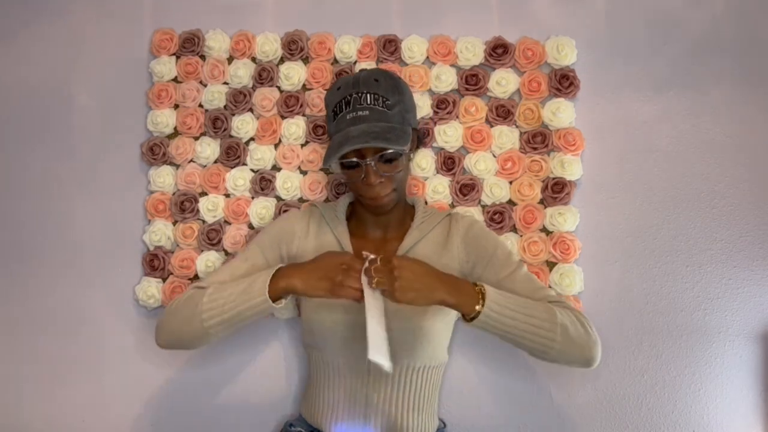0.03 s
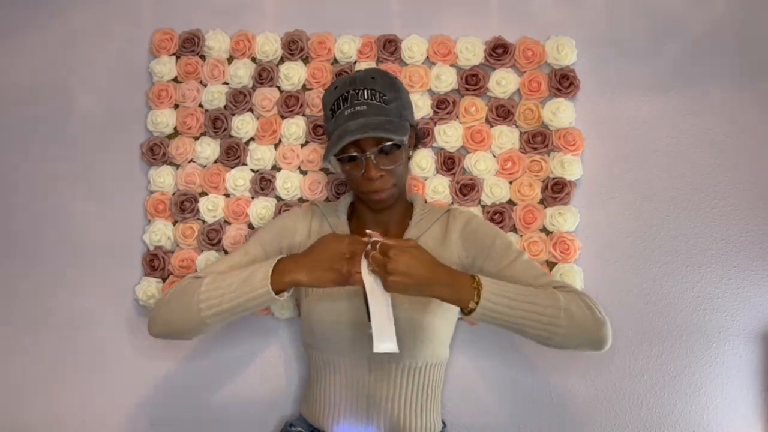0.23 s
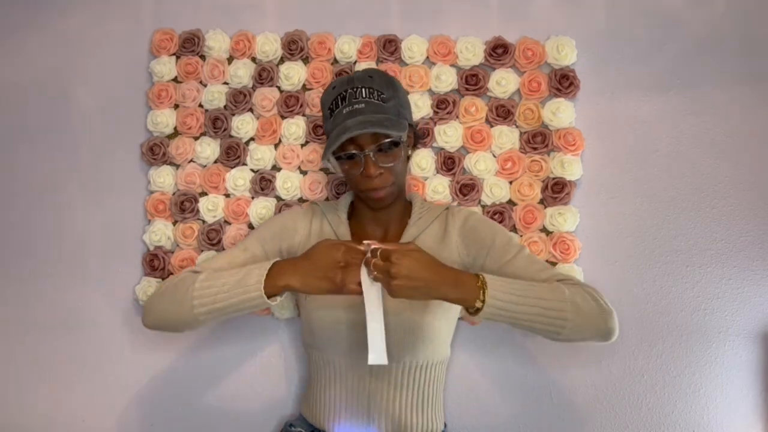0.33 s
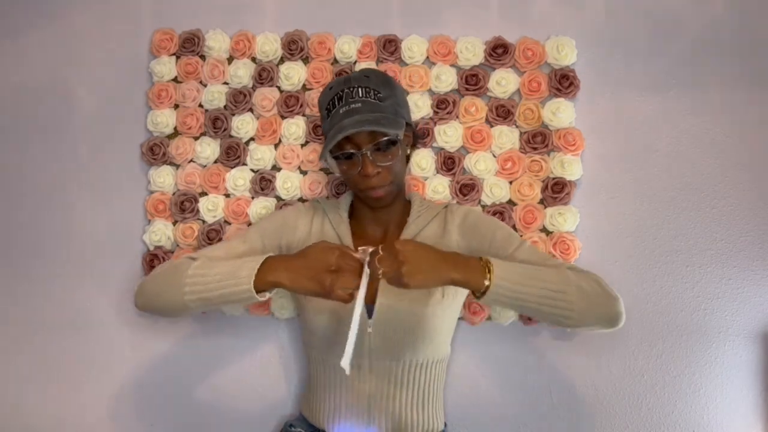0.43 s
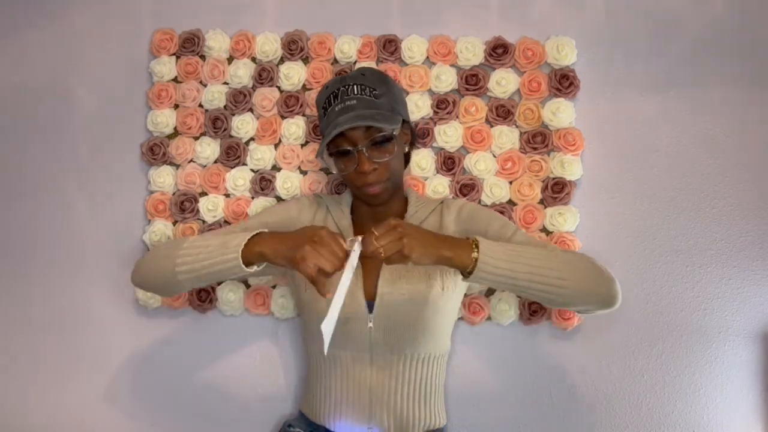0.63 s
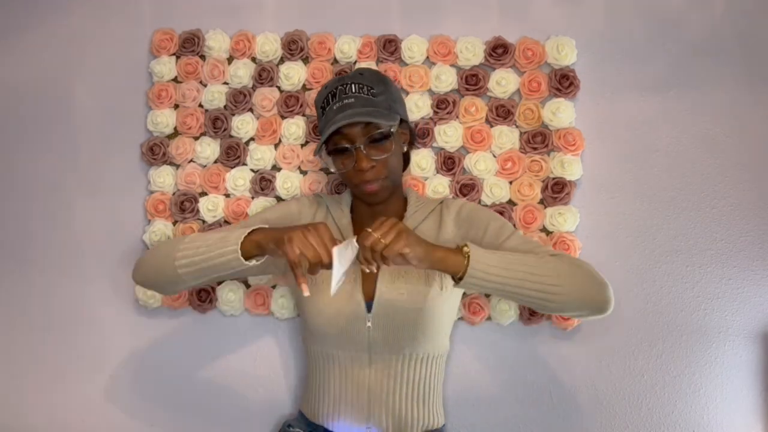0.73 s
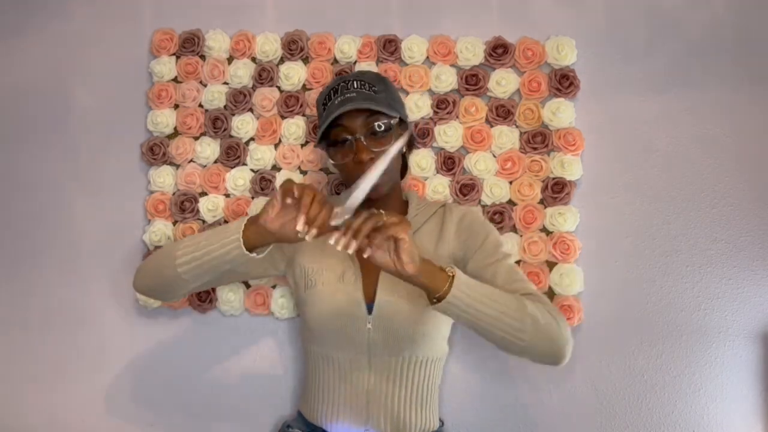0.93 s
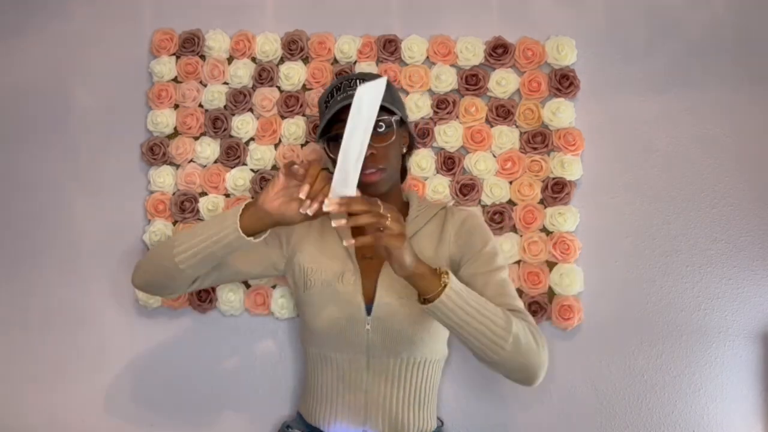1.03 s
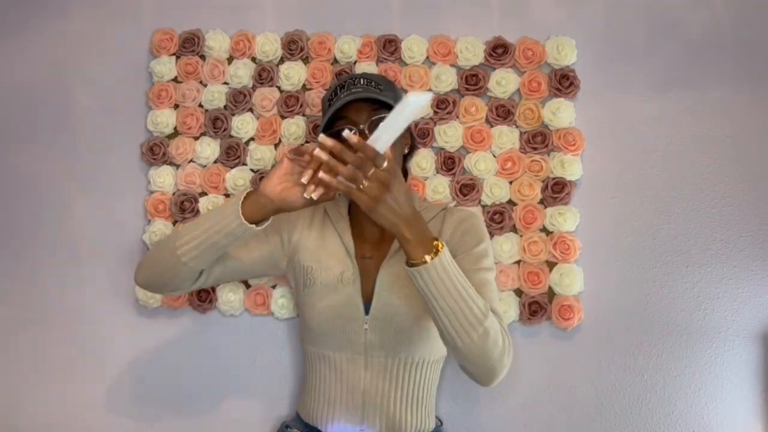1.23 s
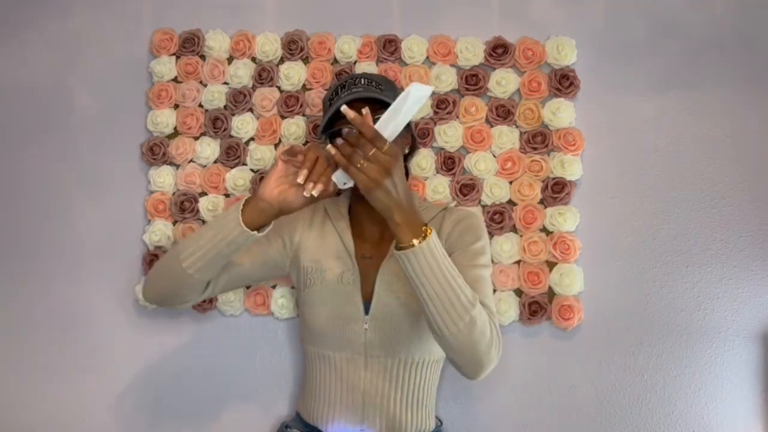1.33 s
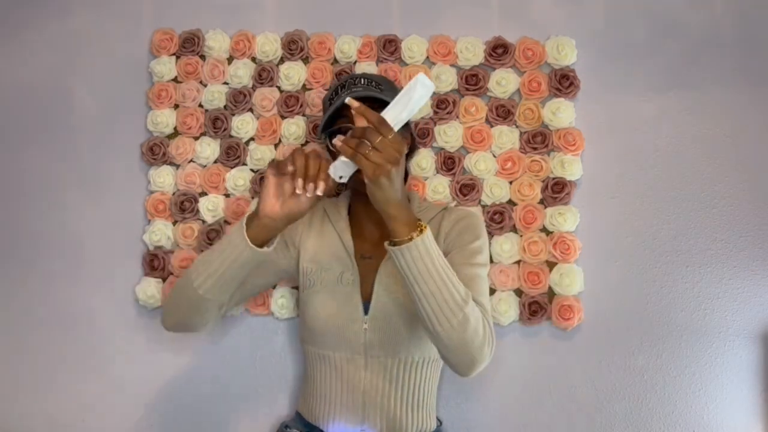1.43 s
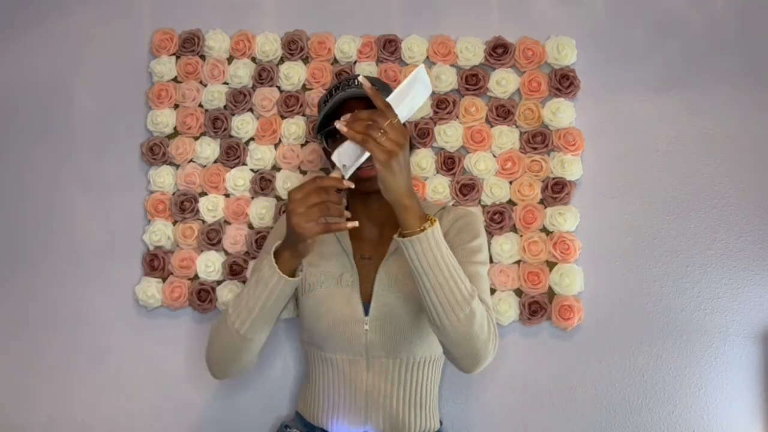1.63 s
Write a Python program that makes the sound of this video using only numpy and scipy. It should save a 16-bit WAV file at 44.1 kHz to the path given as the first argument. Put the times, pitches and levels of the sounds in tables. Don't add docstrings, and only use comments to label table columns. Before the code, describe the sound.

Thin plastic film crackles and snaps as fingers tug and tear a small packet in a room.

```python
import sys
import numpy as np
from scipy import signal
from scipy.fft import rfft, irfft
from scipy.io import wavfile
from scipy.ndimage import uniform_filter1d

SR = 44100
rng = np.random.default_rng(int(sys.argv[2]) if len(sys.argv) > 2 else 0)


def put_to_file(sound):
    columns = np.atleast_2d(sound).T
    safe = np.clip(columns, -1, 1)
    whole_steps = np.round(safe * 32767)
    wavfile.write(sys.argv[1], SR, whole_steps.astype(np.int16))


def gain_from_decibels(decibels):
    exponent = np.asarray(decibels, float) / 20
    return 10 ** exponent


N = 74970

# start_s, peak_db,
# pitch_hz, crack_over_pitch_db, share_to_walls_db
TUGS = [(0.001, -52, 4700, 2, 5.5), (0.038, -46.5, 4850, 4, -9), (0.043, -46.5, 6300, -1.5, 5.5),
        (0.054, -47, 6310, -20, -20), (0.125, -27.5, 6150, -14.5, -5.5), (0.161, -29.5, 6850, -23, -4),
        (0.193, -38, 3780, -9, -4), (0.229, -20.5, 3130, -4, -2), (0.229, -32, 6400, 4, 5),
        (0.229, -33.5, 1310, -23, 1), (0.2352, -25, 3300, -6, 0), (0.363, -53.5, 2290, -6, 9.5),
        (0.387, -45.5, 1370, -3.5, 1), (0.407, -75.5, 1680, -31, -10), (0.432, -44.5, 2140, -2.5, -1),
        (0.4615, -44, 2220, 3, 2), (0.464, -23.5, 4340, -8, -11), (0.464, -31.5, 6300, -18, 6.5),
        (0.468, -32, 2660, -11, 3.5), (0.6135, -58.5, 3100, 0.5, -1), (0.633, -54, 1660, -14, -1),
        (0.659, -28.5, 3000, -17, -1.5), (0.659, -49, 2270, -20, -6), (0.711, -28, 6700, -9, 6.5),
        (0.828, -30, 2770, -16, 1.5), (0.833, -32, 2450, -10, -7), (0.846, -37.5, 2900, -18, 0),
        (0.881, -38.5, 4180, -25, -8), (1.189, -36.5, 3030, -9, -1.5), (1.4058, -27, 2240, -16.5, -0.5),
        (1.4058, -31.5, 4440, -1.5, 2), (1.4138, -22, 2930, -30, -10), (1.478, -41, 1830, -7, -5),
        (1.4815, -33, 1970, -21, -4.5), (1.49, -45, 2170, -26, -4), (1.575, -43, 2130, -19, -2),
        (1.586, -38, 3650, -37, -6), (1.586, -44, 1680, -13, -3), (1.626, -43.5, 2920, -10, -3)]
# start_s, peak_db, pitch_hz, crack_over_pitch_db, share_to_walls_db
TEARS = [(0.795, -25.5, 3110, -2.5, -4), (0.7938, -27, 6100, -14, -2), (0.8225, -33.5, 7560, -2, 0.5),
         (0.8215, -41.5, 11400, -13, -7), (0.947, -45, 2530, -4, -4), (1.016, -55.5, 2740, -12.5, 10),
         (1.057, -58, 1426, 1.5, 0.5), (1.063, -49, 2880, -6, -1), (1.196, -39, 6250, -10, 1),
         (1.233, -38.5, 6400, -27, 6.5), (1.241, -35, 2680, 2, -7), (1.2435, -30.5, 6340, -4.5, 3.5),
         (1.247, -29.5, 2720, -7, -3), (1.251, -30, 4700, -20, -15), (1.255, -37, 5860, -10, -7),
         (1.268, -32, 4970, 1.5, -2), (1.273, -39, 5470, -9, -13), (1.2894, -33.5, 5930, -3, 3),
         (1.2916, -29.5, 2640, -11, -5), (1.294, -34.5, 1390, -5, -8), (1.3203, -27, 8000, -6, -5),
         (1.3228, -30.5, 4440, 3.5, -3.5), (1.324, -30, 2150, 0, -2.5), (1.352, -38, 2170, -14, 2),
         (1.365, -37, 2580, -26, 2), (1.534, -52.5, 1670, -4, 6)]
# start_s, effort_db, grip_db
HANDS = [(0.0, -49.5, 6.5), (0.118, -64, -4), (0.355, -59, -1.5), (0.487, -77.5, -23.5), (0.684, -60.5, 10),
         (0.832, -64, 6), (0.95, -64, 9.5), (1.005, -76, 15.5), (1.064, -61.5, 6), (1.1, -76.5, 4),
         (1.154, -89, 13), (1.186, -80, -1), (1.195, -58.5, -1), (1.23, -59.5, -6), (1.25, -49.5, 1.5),
         (1.368, -54, 7), (1.4, -64, 10), (1.5, -60.5, 9.5), (1.594, -68.5, 15), (1.7, -62, -39)]
# start_s, peak_db, pitch_hz
KNOCKS = [(0.102, -53.5, 450), (.231, -56, 450), (.231, -45.5, 1030), (.465, -58.5, 500),
          (0.376, -50.5, 510), (0.601, -61.5, 59), (0.739, -68, 357), (.797, -38, 830), (0.837, -48, 380),
          (0.857, -58, 380), (1.06, -56, 760), (1.191, -51, 1010), (1.248, -40, 796), (1.251, -49.5, 257),
          (1.292, -43, 450), (1.323, -41.5, 377), (1.325, -51, 169), (1.33, -36.5, 970), (1.55, -59, 450)]
# frequency_hz, level_db
FILM_TONE = [(500, -23), (1500, 16.5), (3000, 17.5), (4600, 13.5), (6500, 23), (9000, 4.5), (12000, 0),
             (16000, -56)]
# delay_s, left_db, right_db
WALLS = [(.0028, -14, -15), (.0042, -10, -11), (.0058, -7, -5), (.0082, -13, -14), (.0106, -5, -8),
         (.0145, -11, -12), (.019, -11, -14)]
# frequency_hz, decay_s
ROOM_DECAY = [(250, 0.19), (700, 0.33), (2000, 0.16), (5000, 0.24), (9000, 0.18), (15000, 0.086)]
# frequency_hz, likeness_ratio
SAMENESS = [(60, 0.99), (130, 0.45), (300, 0.57), (700, 0), (1500, 0), (8000, 0.63)]
# frequency_hz, balance_db
BALANCE = [(60, -2), (150, 6.5), (380, -3.5), (950, 4), (2380, 0.5), (5980, 8.5), (15000, -5.5)]
# frequency_hz, lead_rad
PORT_LEAD = [(300, 0), (700, .3), (1200, -.3), (3500, 1.3), (6400, 1.7), (8500, .4), (9700, -3),
             (10800, -3.1), (11400, -6.2), (12700, -6.4), (13300, -9.1), (14300, -9.6), (15100, -12.6)]
# frequency_hz, density_db (per Hz)
HUM_TONE = [(15, -60), (30, -27.5), (58, 0.5), (100, -11), (300, -18), (800, -29.5), (1700, -21),
            (3000, -33), (9000, -50.5), (16000, -87)]
# frequency_hz, gain_db
MIC_TONE = [(3000, -1.5), (4400, 3.5), (6500, -3.5), (9000, 2), (10200, 12.5), (11800, 9), (13600, 20.5),
            (15400, 26.5), (17100, -19)]


def read(points, hz):
    f, value = np.transpose(points)
    return np.interp(np.log(hz + 1), np.log(f + 1), value)


def evened(x):
    return x / np.sqrt(np.mean(x ** 2) + 1e-20)


def colour(x, table):
    hz = abs(np.fft.fftfreq(4096, 1 / SR))
    log_gain = np.log(gain_from_decibels(read(table, hz)))
    spectrum = np.exp(np.conj(signal.hilbert(log_gain)))
    taps = np.fft.ifft(spectrum).real[:2048]
    taps = taps.reshape((1,) * (x.ndim - 1) + (-1,))
    return signal.oaconvolve(x, taps, axes=-1)[..., :x.shape[-1]]


def ring(hz, q):
    u = np.arange(0, 9, np.pi * hz / q / SR)
    return np.e * u * np.exp(-u) * np.sin(2 * q * u)


def add(mix, s, sound):
    part = mix[round(s * SR):][:len(sound)]
    part += sound[:len(part)]


def snaps():
    snap_db, lead_in_s, crease_q, thin_hz = 1, 0.0008, 2.16, 640
    tug_after_db, tug_slip_s = -17, 0.0007
    tear_after_db, tear_slip_s, tear_front_db = -8.5, 0.0017, -5
    creases = TUGS + TEARS
    t = np.arange(800) / SR
    rings, cracks = np.zeros((N, 2)), np.zeros((N, 2))
    slips, grit = rng.standard_normal((len(creases), len(t), 2)).transpose(2, 0, 1) ** 3 / 8
    for k, (s, db, hz, wide_db, wall_db) in enumerate(creases):
        if k < len(TUGS):
            front = 1
            after = gain_from_decibels(tug_after_db) * np.exp(-t / tug_slip_s)
        else:
            front = gain_from_decibels(tear_front_db)
            after = gain_from_decibels(tear_after_db) * np.exp(-t / tear_slip_s)
        ways = gain_from_decibels(db + snap_db + np.array([0, wall_db]))
        ringing = np.convolve(np.r_[front, slips[k] * after], ring(hz, crease_q))
        crack = np.r_[front, grit[k] * after]
        add(rings, s + lead_in_s, np.outer(ringing, ways))
        add(cracks, s + lead_in_s, np.outer(crack, ways * gain_from_decibels(wide_db)))
    thin_rings = signal.lfilter(*signal.butter(2, thin_hz, "high", fs=SR), rings.T)
    return thin_rings + colour(cracks.T, FILM_TONE)


def crinkle():
    crinkle_db, crinkles_per_s, spread_db, crinkle_q = -4.5, 1100, 4, 2.5
    brighten = 0.055
    start_s, effort_db, grip_db = np.transpose(HANDS)
    t = np.arange(N) / SR
    effort = np.interp(t, start_s, effort_db)
    sizes = gain_from_decibels(spread_db * np.minimum(rng.exponential(size=N), 3))
    pops = sizes * (rng.random(N) < crinkles_per_s / SR)
    pitches = np.geomspace(1243, 10700, num=24)
    which = rng.integers(0, len(pitches), N)
    tilt_db = brighten * (effort + 32)
    fine = np.zeros(N)
    for k, hz in enumerate(pitches):
        grain = ring(hz, crinkle_q) * gain_from_decibels(read(FILM_TONE, hz)) * np.sqrt(hz)
        band = signal.oaconvolve(pops * (which == k), grain)[:N]
        fine += band * gain_from_decibels(tilt_db * np.log2(hz / 3000))

    rub_hz, rub_width_hz, rub_db, rub_grit_db = 450, 2800, -9.5, 5
    rub = rng.standard_normal(N)
    rub = rub * gain_from_decibels(rub_grit_db * evened(uniform_filter1d(rng.standard_normal(N), size=200)))
    for _ in range(2):
        rub = signal.lfilter(*signal.iirpeak(rub_hz, rub_hz / rub_width_hz, SR), rub)
    low = gain_from_decibels(rub_db + np.interp(t, start_s, grip_db)) * evened(rub)
    return gain_from_decibels(crinkle_db + effort) * (evened(fine) + low)


def knocks():
    out = np.zeros(N)
    for s, db, hz in KNOCKS:
        add(out, s, gain_from_decibels(db) * ring(hz, 1.62))
    return out


def room(direct, thrown):
    sways_per_s = 2.3
    straight = ports(np.eye(1, 1024) + np.zeros((2, 1)))
    out = signal.fftconvolve(direct[None], straight, axes=1)[:, 64:N + 64]
    place = np.arange(N) / SR * sways_per_s % 1 * 4
    for k in range(4):
        near = tail(SR // 2)
        for s, left_db, right_db in WALLS:
            at = round(s * SR) + rng.integers(-12, 12) + np.array([0, rng.integers(-3, 3)])
            near[[0, 1], at] += gain_from_decibels(np.array([left_db, right_db])) * rng.choice([-1, 1])
        closeness = np.maximum(1 - abs((place - k + 2) % 4 - 2), 0)
        share = np.sin(np.pi / 2 * closeness) ** 2
        out = out + signal.fftconvolve((thrown * share)[None], ports(near), axes=1)[:, 64:N + 64]
    return out


def tail(size):
    tail_db, rise_s = 3, 0.0016
    taps = np.zeros((2, size))
    at = np.arange(60, size - 12, 12) + rng.integers(0, 12, (2, (size - 61) // 12))
    np.put_along_axis(taps, at, rng.choice([-1., 1.], at.shape), 1)
    hz, t, z = signal.stft(taps, SR, nperseg=128)
    fading = pair(*z, hz) * gain_from_decibels(-60 * t / read(ROOM_DECAY, hz)[:, None])
    out = signal.istft(fading, SR, nperseg=128)[1][:, :size]
    out = out * (1 - np.exp(-np.arange(size) / SR / rise_s))
    return gain_from_decibels(tail_db) * out / np.linalg.norm(out[0])


def ports(h):
    hz = np.fft.rfftfreq(h.shape[1], 1 / SR)
    lead = np.exp(np.outer([.5j, -.5j], read(PORT_LEAD, hz)))
    balance = gain_from_decibels(np.outer([.5, -.5], read(BALANCE, hz)))
    return np.roll(irfft(rfft(h) * lead * balance, h.shape[1]), 64, 1)


def pair(z, other, hz):
    same = np.clip(read(SAMENESS, hz), -1, 1)[:, None]
    return np.array([z, same * z + np.sqrt(1 - same ** 2) * other])


def hum():
    hum_db, swell_db = -66, 0.5
    hz = np.fft.rfftfreq(2048, 1 / SR)
    a, b, c, d, e = rng.standard_normal((N // 512 + 5, 1025, 5)).T
    lumps = uniform_filter1d(e, size=5, axis=0)
    lumps = evened(uniform_filter1d(lumps, size=5, axis=1))
    z = pair(a + 1j * b, c + 1j * d, hz)
    z = z * gain_from_decibels(read(HUM_TONE, hz)[:, None] + swell_db * lumps)
    return gain_from_decibels(hum_db) * evened(signal.istft(z, nperseg=2048, noverlap=1536)[1][:, :N])


def scene():
    direct, thrown = snaps() + crinkle() + knocks()
    return room(direct, thrown) + hum()


def top_cut(x):
    return signal.sosfilt(signal.butter(12, 17150, fs=SR, output="sos"), x)


def record(dry):
    return top_cut(colour(dry, MIC_TONE))


dry = scene()
out = record(dry)
put_to_file(out)
```